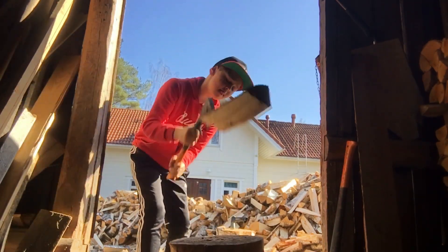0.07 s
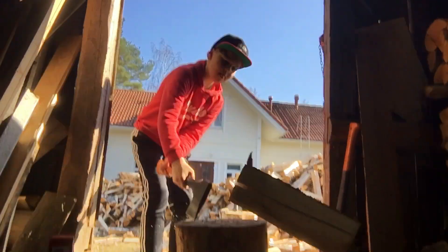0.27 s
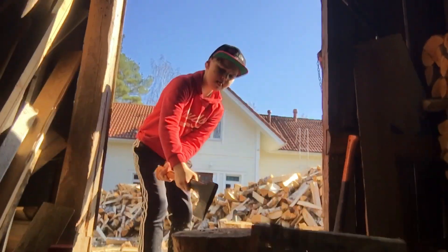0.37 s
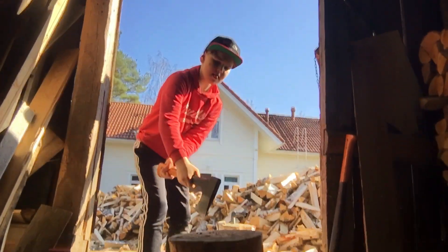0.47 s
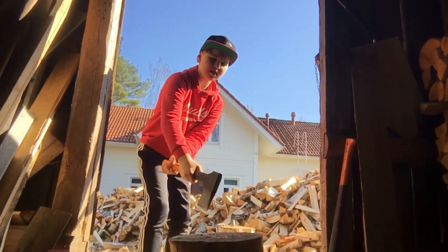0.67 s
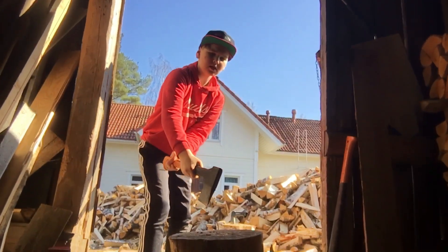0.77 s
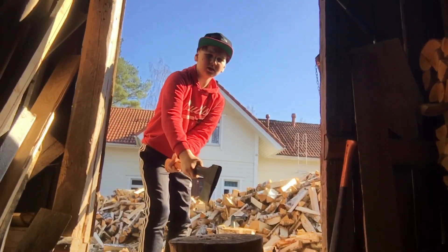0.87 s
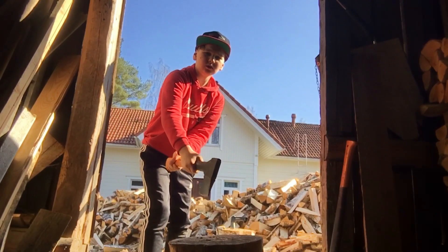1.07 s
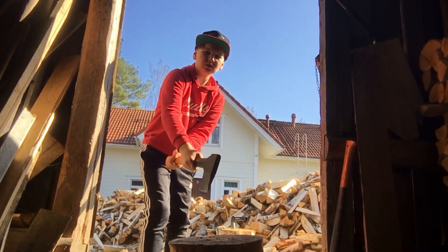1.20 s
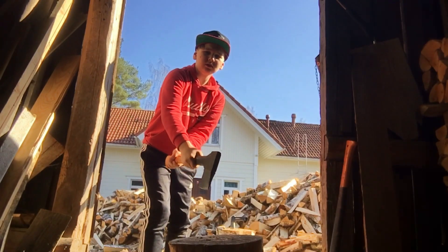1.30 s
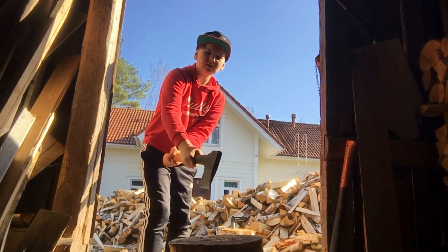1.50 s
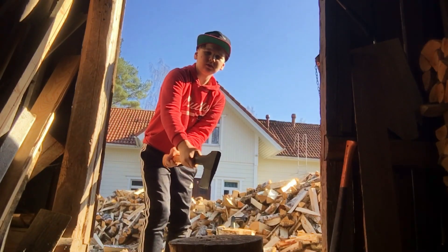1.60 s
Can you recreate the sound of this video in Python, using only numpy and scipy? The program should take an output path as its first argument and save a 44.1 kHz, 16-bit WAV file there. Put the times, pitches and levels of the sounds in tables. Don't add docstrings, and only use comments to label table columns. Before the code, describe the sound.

After a faint swish, a crisp wood-splitting chop, then two louder hollow wooden bangs and a rapid, fading run of knocks, recorded close in a dry shed opening onto a quiet yard.

```python
import sys
import numpy as np
from scipy import signal
from scipy.io import wavfile
from scipy.ndimage import uniform_filter1d

SR = 44100
rng = np.random.default_rng(int(sys.argv[2]) if len(sys.argv) > 2 else 0)


def wav_out(sig):
    wavfile.write(sys.argv[1], SR, np.round(np.clip(np.atleast_2d(sig).T, -1, 1) * 32767).astype(np.int16))


def volts(x):
    e = np.asarray(x, float) / 20
    return 10 ** e


N = 72765

# [f/Hz, density/dB per Hz]
YARD_AIR = [(24, -26.5), (40, 6), (90, -12.5), (127, -10.5), (164, -15), (285, -16.5), (1090, -22.5),
            (1400, -23.5), (16500, -49.5)]
# [f/Hz, T60/s]
SHED_DECAY = [(100, 0.7), (400, 0.4), (1200, 0.25), (2800, .25), (5000, 0.3), (12000, 0.15)]
# [t/s, level/dB]
DUST_LEVEL = [(0.218, -110), (0.239, -66.5), (0.447, -60.5), (.56, -62), (0.801, -58), (.955, -57.5),
              (0.971, -70), (1.04, -64.5), (1.11, -69.5), (1.14, -110)]
# [t/s, level/dB]
SLEEVE_LEVEL = [(.09, -81), (.115, -62), (.145, -58), (.175, -70.5), (.205, -52.5), (.226, -54.5),
                (.232, -96)]
# [t/s, level/dB, centre f/Hz]
SWING_PATH = [(.09, -115.5, 1500), (.143, -89, 1500), (0.15, -61.5, 1500), (0.171, -65, 1883),
              (.193, -63.5, 1900), (.2, -49, 2200), (0.209, -52.5, 2140), (0.217, -57, 2370),
              (.226, -46, 3300), (.232, -100, 3500)]
# [t/s, peak level/dB, f/Hz]
BEAM_THUMPS = [(0.228, -32, 90), (0.341, -35.5, 56.3), (0.552, -26, 134.2), (0.441, -44.5, 74),
               (0.599, -40, 65), (0.749, -42.5, 70.4), (0.81, -37.5, 65.6), (0.894, -39, 70),
               (0.927, -44, 75.8), (1.0, -48.5, 73.4), (1.066, -53.5, 75.77), (1.1, -52, 72),
               (1.139, -48, 77.7)]
# [t/s, peak level/dB, ringing f/Hz, T60/s]
STEEL_JOLTS = [
    (.575, -45, 6150, .17),
    (.583, -46, 4900, .1),
    (.615, -43, 4750, .11),
]
# [t/s, peak level/dB, centre f/Hz]
BARK_TICKS = [(.516, -42, 4476), (0.5394, -36.5, 2700), (0.545, -32.5, 3100), (0.694, -39.5, 6500),
              (.711, -33.5, 3500), (.712, -43, 10040), (1.022, -46.5, 9860), (1.069, -56, 12000),
              (1.069, -64, 4200), (1.179, -65, 3300), (0.14, -50, 3460), (.826, -40.5, 12070),
              (.982, -52.5, 6066)]
# [t/s, peak level/dB, f/Hz, contact/ms]
BILLET_KNOCKS = [(0.377, -22.5, 900, 2.5), (.395, -27, 756, 27), (0.4111, -14.5, 1026, 6.6),
                 (0.424, -28.5, 840, 2.8), (0.4343, -16.5, 1228, 4.3), (0.439, -20, 986, 1.5),
                 (.443, -36.5, 770, 42), (0.461, -30, 1230, 6.4), (0.474, -19, 635, 3.9),
                 (0.512, -24, 927, 17.3), (.528, -23, 650, 1.3), (.67, -22.5, 468, 2.2),
                 (0.682, -21, 890, 14.2), (0.7, -27, 577, 4), (0.724, -30, 628, 33),
                 (0.7581, -15, 436, 2.16), (.765, -26.5, 1170, 5.6), (.774, -28.5, 420, 6),
                 (0.788, -29, 324, 17.7), (.8, -29.5, 359.5, 8.2), (0.812, -33.5, 396, 16.6),
                 (0.827, -32.5, 380, 6), (.831, -26.5, 990, 6), (0.849, -34, 350, 6.1),
                 (0.862, -32.5, 329, 4.8), (0.873, -40.5, 366, 5.5), (.897, -51.5, 330, 2.8),
                 (0.919, -47.5, 377, 0.89)]
# [ratio to its pitch, level/dB, width as share of pitch]
BILLET_OVERTONES = [(.45, 12, 0.067), (1, 20.5, 0.17), (1.5, 0.5, .15), (2.6, 1, 0.035), (4.2, -31.5, .2)]
# [f/Hz, density/dB per Hz]
PILE_BODY = [(59, -48), (100, -17), (232, -4.5), (267, 5), (468, 1.5), (712, -5.5), (1220, -4.5),
             (2670, -31), (12000, -62), (15600, -85.5), (22000, -120)]
# [t/s, peak level/dB,
# f/Hz, width/Hz]
WOOD_TAPS = [(0.2494, -20, 880, 110), (.2525, -20, 700, 110), (.558, -7, 579.3, 60.6),
             (0.851, -33.5, 363, 70), (0.865, -39, 363, 70), (0.986, -46.5, 683, 130),
             (.9853, -44.5, 1070, 398), (1.045, -50.5, 640, 199.8), (1.078, -52, 721, 400),
             (1.116, -49, 630, 89.3), (1.1165, -49.5, 970, 298.6), (1.101, -59, 2185, 160)]
# [t/s, peak level/dB, length/ms, centre f/Hz]
FIBRE_CRACKS = [(0.2265, -10, 4.5, 3000), (0.227, -19, 4.2, 13000), (.232, -39, 9.4, 7000),
                (0.238, -38, 3.9, 4060), (0.3002, -13.5, 4.3, 2940), (0.3006, -24, 7, 5580),
                (.302, -37, 4.6, 12000), (0.303, 2, 1.3, 1560), (0.5465, -23, 2, 2800),
                (.549, -17, 13, 4240), (.549, -39, 14, 9950), (0.4326, -13, 1.2, 1510),
                (0.435, -46.5, 2, 5000), (0.7616, -35, 3.3, 4020), (0.763, -38, 10, 1870),
                (.8, -39.5, 19, 1860), (0.8249, -32, 2.5, 3780), (0.825, -41.5, 0.83, 2197),
                (1.022, -42.5, 0.96, 2474), (1.0214, -35, 0.71, 3600), (1.102, -52, 1.8, 2650),
                (0.475, -48, 4.4, 5430), (0.691, -45, 23, 3000)]
# [t/s, peak level/dB, contact/ms, edge f/Hz]
PLANK_LANDINGS = [(.5492, -1.5, 0.66, 3500), (.5532, 1, 2.4, 4000), (.5562, -3, 1.5, 2990),
                  (.561, -4.5, 0.91, 3000), (.5655, -4.5, 3.2, 3000), (.572, -10, 1.6, 2500),
                  (.582, -15.5, 3.1, 2548), (.592, -14, 1.5, 2800), (.6, -18, 1.7, 2484),
                  (.61, -23.5, 5.8, 1438), (.63, -25, 10.7, 1860)]
# [f/Hz, width/Hz, level/dB]
PLANK_MODES = [(368, 40, 2.5), (580, 54, 4), (843, 62, -4.5), (980, 85, -2), (1146, 24, 7),
               (1280, 40, -11.5), (1582, 70, -8), (1919, 17, -7.5), (2200, 60, -20), (2841, 60, -12.5),
               (3180, 35, -18.5), (3480, 90, -23.5)]
# [f/Hz, density/dB per Hz]
PLANK_BODY = [(100, -20.5), (350, -6.5), (580, 1), (1150, -8), (1900, -14), (3000, -21), (7000, -48),
              (16000, -67.5)]
# [t/s, peak level/dB, contact/ms, edge f/Hz]
WALL_BANGS = [
    (.3035, -2, 2.25, 4500),
    (.3058, -2, 1.6, 5000),
    (.3085, -1.5, 1.54, 3500),
    (.3115, -10, 1.15, 3000),
    (.322, -6.5, 2.7, 2500),
    (.33, -12.5, 1.1, 2500),
    (.337, -18, 4.1, 2500),
    (.355, -19, 2, 2000),
]
# [f/Hz, width/Hz, level/dB]
WALL_MODES = [(190, 70, -3), (380, 66, -2.5), (580, 180, -8.5), (810, 60, -3), (1047, 85, 4),
              (1325, 37, -4), (1499, 60, -5.5), (2100, 47, -5.5), (2480, 80, -7), (2850, 82, -14),
              (3010, 270, -14.5), (3915, 86, -22)]
# [f/Hz, density/dB per Hz]
WALL_BODY = [(100, -22.5), (200, -8.5), (420, -1), (700, -9), (1100, -2.5), (1600, -19.5), (3500, -25),
             (16000, -65.5)]
# [t/s, peak level/dB, contact/ms, edge f/Hz]
AXE_BLOWS = [
    (.2275, -8.5, 2.2, 15000),
    (.2305, -9.5, 1.5, 9000),
    (.2385, -14, 2, 9000),
    (.249, -22, 2, 2517),
    (.256, -21, 2, 2515),
    (.264, -26.5, 3, 2500),
]
# [f/Hz, width/Hz, level/dB]
BLOCK_MODES = [(312, 210, 6.5), (1520, 73, -9.5), (2900, 140, -4), (3200, 100, -10)]
# [f/Hz, density/dB per Hz]
BLOCK_BODY = [(59, -36), (100, 5), (502, -6), (891, -2), (1130, -10.5), (1480, -4.5), (1610, -7.5),
              (4380, -15.5), (16000, -49)]

RISE_MS, SNAP_DB = 0.6, 2


def band(x, hz, width):
    return signal.lfilter(*signal.iirpeak(min(hz, .45 * SR), max(hz / width, .3), SR), x)


def twice_band(x, hz, width):
    return band(band(x, hz, width), hz, width)


def push(ms, edge_hz):
    t_ms = np.arange(4000) / SR * 1000
    force = rng.standard_normal(4000) * np.exp(-t_ms / ms) * (1 - np.exp(-t_ms / RISE_MS))
    force[int(RISE_MS * SR / 1000)] += volts(SNAP_DB) * np.linalg.norm(force) / max(ms / 1.9, 1)
    return signal.lfilter(*signal.butter(3, min(edge_hz, .45 * SR), fs=SR), force)


def boards(force, body, count=200):
    t60_s = .06
    t = np.arange(4000) / SR
    f, density = np.array(body).T
    place, size, turn = rng.random((count, 3)).T[:, :, None]
    hz = 100 * 160 ** ((np.arange(count)[:, None] + place) / count)
    db = np.interp(np.log(hz), np.log(f), density) + 5 * size
    db = db + 9 * np.log(hz / 1000)
    db = db - 60 * t / t60_s * (hz / 1000) ** 0.59
    modes = np.sum(volts(db) * np.sin(2 * np.pi * (hz * t + turn)), axis=0)
    ring = signal.fftconvolve(force, modes)[:len(force)]
    return ring / np.abs(ring).max()


def with_boards(main, force, body, body_db, count=200):
    return main / np.abs(main).max() + volts(body_db) * boards(force, body, count)


def add(out, s, db, sound):
    i = int(s * SR)
    out[i:i + len(sound)] += (sound * volts(db) / np.abs(sound).max())[:N - i]


def air():
    out = np.zeros(N)
    f, density = np.array(YARD_AIR).T
    for hz in 30 * 2 ** np.arange(0, 9.2, .5):
        sway = uniform_filter1d(rng.standard_normal(N), size=3000) * 55
        noise = twice_band(rng.standard_normal(N), hz, 0.97 * hz)
        out += volts(np.interp(np.log(hz), np.log(f), density) + 1.5 * sway) * noise
    return out * volts(-64) / np.std(out)


def space(x):
    shed_db, yard_db, yard_t60_s, yard_end_s = -11, -40.5, .6, 0.58
    t = np.arange(int(.5 * SR)) / SR
    f, t60 = np.array(SHED_DECAY).T
    shed = np.zeros(len(t))
    for hz in 70 * 2 ** np.arange(0, 8, .5):
        fade = volts(-60 * t / np.interp(np.log(hz), np.log(f), t60))
        shed += band(rng.standard_normal(len(t)), hz, .5 * hz) * fade
    shed = signal.lfilter([1, -.6], [1], shed) * (1 - np.exp(-t / .004))
    yard = band(rng.standard_normal(len(t)), 2000, 3000) * volts(-60 * t / yard_t60_s) * (t < yard_end_s)
    tail = volts(shed_db) * shed / np.linalg.norm(shed) + volts(yard_db) * yard / np.linalg.norm(yard)
    return x + signal.fftconvolve(x, tail)[:N]


def dust():
    s, db = np.array(DUST_LEVEL).T
    grains = rng.standard_normal(N) * volts(1.5 * rng.exponential(size=N))
    return volts(np.interp(np.arange(N) / SR, s, db)) * band(grains, 3600, 3300)


def sleeve():
    s, db = np.array(SLEEVE_LEVEL).T
    rustle = band(rng.standard_normal(N), 5100, 4000) + volts(14) * band(rng.standard_normal(N), 250, 200)
    return volts(np.interp(np.arange(N) / SR, s, db, right=-150)) * rustle


def swing():
    t = np.arange(N) / SR
    s, db, hz = np.array(SWING_PATH).T
    slow = signal.lfilter(*signal.butter(2, 350, fs=SR), rng.standard_normal((2, N))) * 8
    phase = 2 * np.pi * np.cumsum(np.interp(t, s, hz)) / SR
    rush = slow[0] * np.cos(phase) + slow[1] * np.sin(phase)
    return volts(np.interp(t, s, db, right=-150)) * rush


def beam_thumps():
    out, t = np.zeros(N), np.arange(8000) / SR
    t60_s = 0.053
    for s, db, hz in BEAM_THUMPS:
        swell = (1 - np.exp(-t / .012)) ** 2
        add(out, s, db, np.sin(2 * np.pi * hz * t) * volts(-60 * t / t60_s) * swell)
    return out


def steel_rings():
    out, t = np.zeros(N), np.arange(8000) / SR
    for s, db, hz, t60 in STEEL_JOLTS:
        add(out, s, db, twice_band(rng.standard_normal(8000), hz, 250) * volts(-60 * t / t60))
    return out


def bark_ticks():
    out = np.zeros(N)
    for s, db, hz in BARK_TICKS:
        add(out, s, db, twice_band(push(1.0, 2.5 * hz), hz, 0.49 * hz))
    return out


def tumble():
    out = np.zeros(N)
    for s, db, hz, ms in BILLET_KNOCKS:
        force = push(ms, 2.84 * hz)
        pitches = hz * (1 + 0.012 * rng.standard_normal(len(BILLET_OVERTONES)))
        main = np.zeros(len(force))
        for (ratio, gain_db, width), pitch in zip(BILLET_OVERTONES, pitches):
            main += volts(gain_db) * band(force, ratio * pitch, width * ratio * pitch)
        add(out, s, db, with_boards(main, force, PILE_BODY, -2.0, count=50))
    return out


def taps():
    out = np.zeros(N)
    for s, db, hz, width in WOOD_TAPS:
        add(out, s, db, band(band(push(1.2, 4.3 * hz), hz, width), hz, 3 * width))
    return out


def cracks():
    out = np.zeros(N)
    for s, db, ms, hz in FIBRE_CRACKS:
        add(out, s, db, twice_band(push(ms, 1.5 * hz), hz, 0.61 * hz))
    return out


def blows(rows, modes, body, body_db):
    out = np.zeros(N)
    for s, db, ms, edge_hz in rows:
        force = push(ms, edge_hz)
        main = np.zeros(len(force))
        for k, (hz, width, gain_db) in enumerate(modes):
            main += (-1) ** k * volts(gain_db) * band(force, hz, width)
        add(out, s, db, with_boards(main, force, body, body_db))
    return out


def plank_landing():
    return blows(PLANK_LANDINGS, PLANK_MODES, PLANK_BODY, -2.5)


def wall_bang():
    return blows(WALL_BANGS, WALL_MODES, WALL_BODY, -2.5)


def axe_blow():
    return blows(AXE_BLOWS, BLOCK_MODES, BLOCK_BODY, 6.5)


def scene():
    hits = axe_blow() + wall_bang() + plank_landing() + cracks() + taps()
    clutter = tumble() + bark_ticks() + beam_thumps() + steel_rings()
    mix = space(hits + clutter) + dust() + swing() + sleeve() + air()
    return mix[None]


def top_cut(x):
    return signal.sosfilt(signal.butter(12, 16640, fs=SR, output="sos"), x)


def record(dry):
    dry = signal.lfilter(*signal.butter(2, 60, "high", fs=SR), dry)
    dry = signal.sosfilt(signal.ellip(8, .2, 60, 16100, fs=SR, output="sos"), dry)
    mix = np.tanh(0.6 * dry) / 0.72
    return top_cut(mix)


dry = scene()
out = record(dry)
wav_out(out)
```